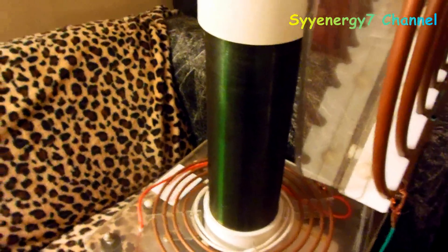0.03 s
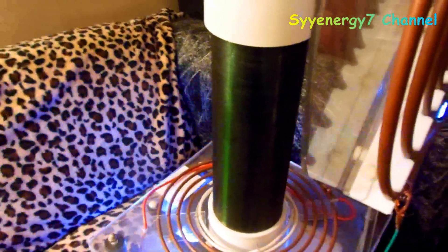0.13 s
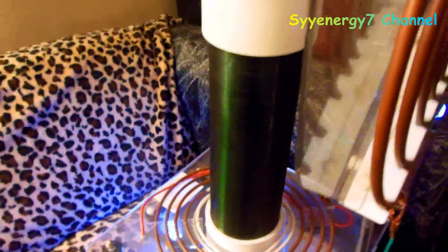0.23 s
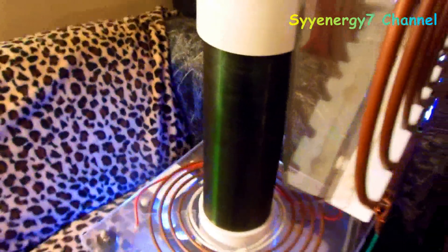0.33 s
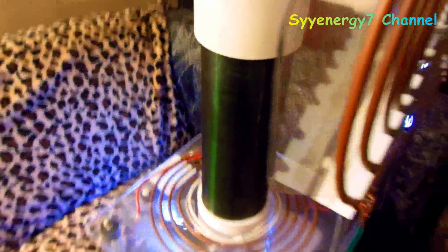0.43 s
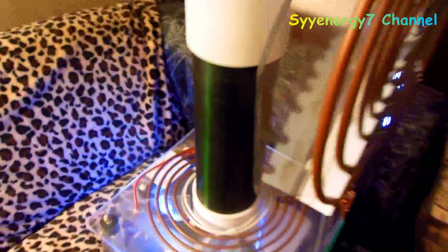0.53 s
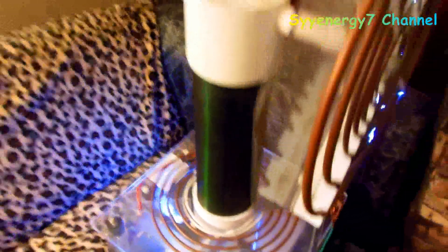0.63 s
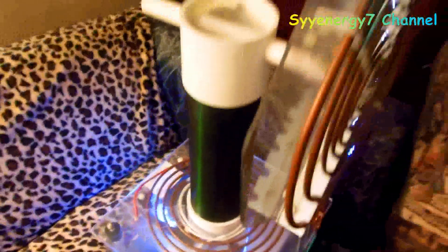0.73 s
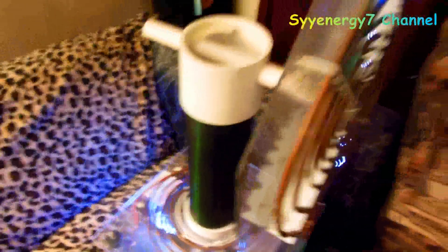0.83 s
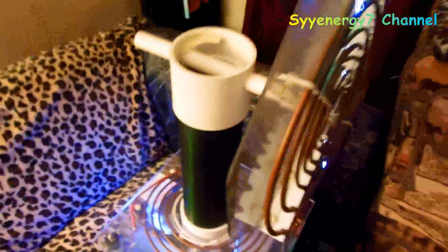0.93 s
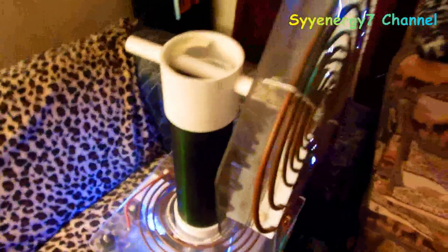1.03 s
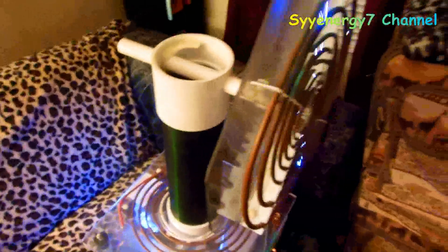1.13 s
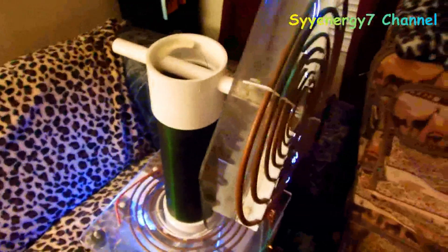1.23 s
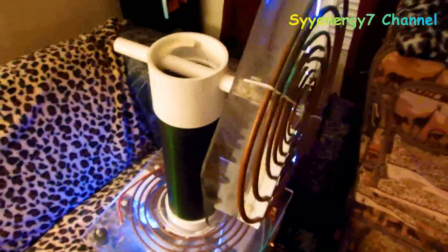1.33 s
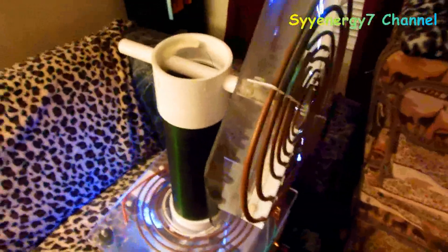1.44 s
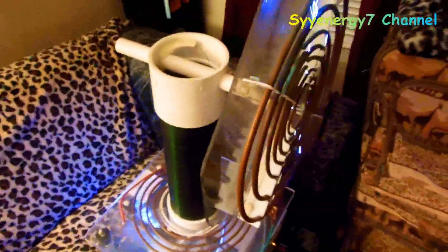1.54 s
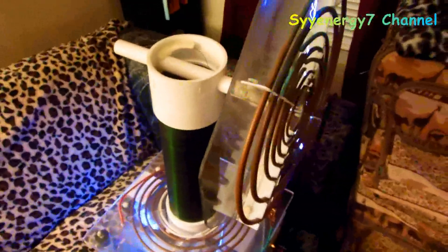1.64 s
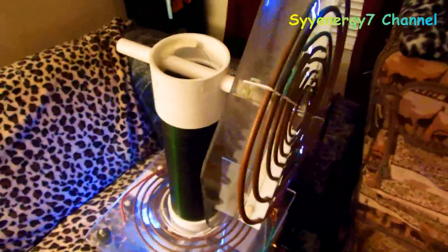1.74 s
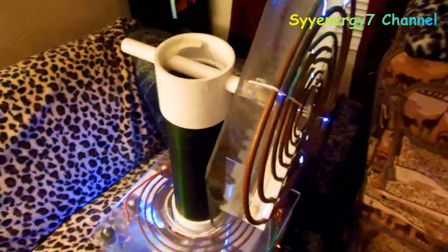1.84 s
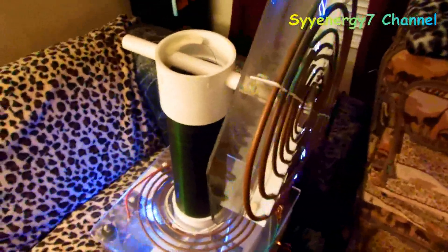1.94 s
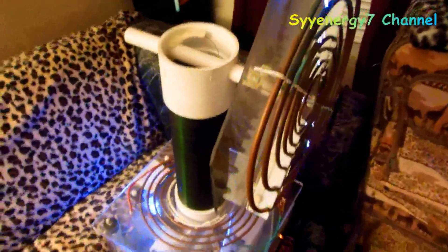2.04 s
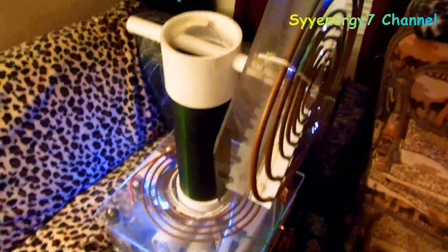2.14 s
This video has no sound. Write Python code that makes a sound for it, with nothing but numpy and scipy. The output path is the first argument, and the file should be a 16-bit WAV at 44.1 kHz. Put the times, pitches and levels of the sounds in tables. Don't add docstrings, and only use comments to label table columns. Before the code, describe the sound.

A harsh electric spark buzz bursts on after a switch snap, overloading, then settles into steady crackle

```python
import sys
import numpy as np
from scipy import signal
from scipy.fft import rfft, irfft
from scipy.io import wavfile
from scipy.ndimage import uniform_filter1d

SR = 44100
rng = np.random.default_rng(int(sys.argv[2]) if len(sys.argv) > 2 else 0)


def to_linear_factor(level_db):
    exponent = np.asarray(level_db, float) / 20
    return 10 ** exponent


def wrap_up_sound(samples):
    columns = np.atleast_2d(samples).T
    tamed = np.clip(columns, -1, 1)
    steps = np.round(tamed * 32767).astype(np.int16)
    wavfile.write(sys.argv[1], SR, steps)


N = 97020
T = np.arange(N) / SR

REFIRE_SHARES = (.55, .15)
# time_s, plate_path_ms, wander_ms
ARC_PATH = [(.2, .5, .03), (.9, .516, .025), (.97, .516, .005), (1.15, .512, .004), (1.2, .516, .02),
            (1.3, .51, .006), (1.42, .508, .004), (1.44, .478, .004), (1.58, .474, .004), (1.6, .512, .008),
            (1.7, .488, .01), (1.8, .5, .018), (1.95, .488, .015), (2.05, .482, .005), (2.2, .5, .006)]
# plate_path_share, left_db, right_db
ECHOES = [
    (.17, -10, -8),
    (.49, -9, -11),
    (.78, -12, -11),
    (1, -2, -1),
    (1.45, -15, -16),
    (1.9, -12, -14),
]
# freq_hz, level_db
CRACK_COLOUR = [(200, -46.5), (1500, -20.5), (3000, -20.5), (4900, -4), (6500, -3.5), (8200, -3.3),
                (11700, -0.4), (14000, -2.5)]
# freq_hz, level_db
ROOM_COLOUR = [(300, -8.5), (900, -13.5), (1600, -5), (2200, -9), (3600, 0.5), (5000, -0.5), (8200, 0.5),
               (11500, 0.7), (14000, 2)]
# time_s, gain_db
SPARK_GAIN = [(.19, 29), (.35, 24), (.5, 19.5), (.65, 11), (.75, 8.5), (.85, 4.5), (.95, -2.2), (1.1, -3.5),
              (1.17, -7), (1.22, -3.5), (1.26, -5), (1.3, -6.5), (1.34, -4), (1.4, -3.5), (1.75, -1.96),
              (2.0, -4.5), (2.2, -4.5)]
# time_s, left_step_fs,
# right_step_fs (full scale)
BIAS_JUMPS = [(0.22, -0.62, 1), (0.2226, 0.22, -1.2), (0.235, 0.08, 0.94), (0.2431, -0.35, -0.61),
              (0.3029, -1.7, -2.8), (0.306, 1, 1), (0.336, -1.1, -0.29), (0.3625, -0.65, -0.49),
              (0.3798, -1.2, -0.47), (0.42, -0.79, -0.32), (0.4345, -1.7, 0.066), (0.4362, 0.01, -0.93),
              (0.4674, -0.78, -1.1), (0.4865, 0.44, 0.14), (0.503, -1.5, -1.3), (0.512, 0.17, 0.58),
              (0.519, -0.39, -1.5), (0.5292, -1.7, -0.84), (0.5366, 1, 0.1), (0.5437, -1.17, -1.24),
              (0.5468, 1, 0.22), (0.5538, -0.41, -0.78), (0.57, -0.56, -2.6), (0.577, 0.38, 0.56),
              (0.5884, 0.76, -0.11), (0.5947, -0.1, -0.58),
              (0.6012, -1.5, -0.7), (0.6098, 0.57, -1.24), (0.62, -2.1, -1.4), (0.6269, 2.2, 0.8),
              (0.6431, -0.77, -0.39), (0.6511, -1.6, -2), (0.6603, -0.21, 0.52), (0.663, 1.6, 0.38),
              (0.6699, -2.5, -0.59), (0.6775, 0.58, 0.17), (0.6833, 1.4, 0.13), (0.7049, -1.16, -0.36),
              (0.7529, -0.92, -0.31), (0.7706, -0.5, 0.0067), (0.7864, 0.08, -0.0011),
              (0.8025, -0.82, -0.18), (0.8183, -0.57, -0.023), (0.8848, -0.15, -0.048),
              (0.9016, -0.16, 0.0003), (1.0135, -0.02, -0.01), (1.2342, -0.03, -0.03),
              (1.7841, -0.06, -0.012), (1.8167, -0.04, -0.02), (1.9178, -0.05, -0.02),
              (1.9689, -0.14, -0.049), (2.051, -0.1, -0.045),
              (0.9684, -0.014, 0.0047), (0.986, -0.032, -0.013), (1.002, -0.049, -0.03),
               (1.068, -0.019, -0.01), (1.2183, -0.017, -0.0075), (1.4688, -0.005, 0.0029),
               (1.951, -0.027, -0.0066)]
# freq_hz, level_db
CLACK_COLOUR = [(300, -18), (1100, 4.5), (1700, 2), (3000, -7), (8000, -2), (14000, -25)]
# freq_hz, rms_db
HUM = [(118.4, -55), (236.9, -70)]
# freq_hz, rms_db
WHINES = [(12328, -80), (13194, -82)]
# freq_hz, density_db (per Hz)
AIR_COLOUR = [(15, -82), (25, -43), (122, -15), (151, -10.5), (363, -20), (511, -54.5), (569, -60),
              (703, -23.5), (14000, -40)]

ON_S, HALF_CYCLE_HZ = 0.2005, 120
PORT_LAG_MS = -0.025
HEADROOM = 0.91


def level(x, db):
    return x * to_linear_factor(db) / np.sqrt(np.mean(x ** 2))


def colour(x, table):
    hz, db = np.array(table).T
    bins_hz = np.arange(1025) * SR / 2048
    log_gain = np.interp(np.log(bins_hz + 1), np.log(hz), db) * np.log(10) / 20
    cepstrum = irfft(log_gain)
    cepstrum[1:1024] *= 2
    cepstrum[1025:] = 0
    response = irfft(np.exp(rfft(cepstrum)))[None, :1024]
    return signal.fftconvolve(np.atleast_2d(x), response, axes=1)[:, :N]


def clicks(times, sizes):
    at = times * SR
    spot = np.floor(at).astype(int)[:, None] + np.arange(-7, 9)
    offset = spot - at[:, None]
    shape = np.sinc(offset) * np.cos(offset * np.pi / 16) ** 2 * sizes[:, None]
    return np.bincount(np.clip(spot, 0, N + 99).ravel(), shape.ravel(), N + 100)[:N]


def band_pass(x, low_hz, high_hz):
    return signal.sosfilt(signal.butter(2, (low_hz, high_hz), "band", fs=SR, output="sos"), x)


def stereo_noise(size, alike_hz):
    mid, side = rng.standard_normal((2, size))
    side = signal.sosfilt(signal.butter(2, min(alike_hz, 15000), "high", fs=SR, output="sos"), side)
    return np.array([mid + side, mid - side])


def firings():
    first_ms, odd_later_ms, jitter_ms = 1.45, 0.75, 0.28
    refire_ms, refire_spread_ms, refire_db, scatter_db = 1.4, 1.5, -2.5, 2.8
    k = np.arange(int(ON_S * HALF_CYCLE_HZ), int(N / SR * HALF_CYCLE_HZ) + 1)
    scatter = rng.standard_normal((len(k), 4)).T
    chance = rng.random((len(k), 4)).T
    first = k / HALF_CYCLE_HZ + (first_ms + odd_later_ms * (k % 2) + jitter_ms * scatter[0]) / 1000
    second = first + (refire_ms + refire_spread_ms * chance[0]) / 1000
    third = second + (refire_ms + refire_spread_ms * chance[1]) / 1000
    again = to_linear_factor(refire_db) * (chance[2] < REFIRE_SHARES[0])
    once_more = again * (chance[3] < REFIRE_SHARES[1])
    strength = to_linear_factor(scatter_db * np.clip(scatter[1:], -3, 1.3))
    sizes = [np.ones(len(k)), again, once_more] * strength
    return np.r_[first, second, third], sizes.ravel()


def cracks(times, sizes):
    arc_s, path_ms, wander_ms = np.array(ARC_PATH).T
    path = np.interp(times, arc_s, path_ms)
    loose = np.interp(times, arc_s, wander_ms)
    wander = rng.standard_normal((len(times), len(ECHOES), 2)).T
    out = np.array([clicks(times, sizes), clicks(times + PORT_LAG_MS / 1000, sizes)])
    for j, (share, *echo_db) in enumerate(ECHOES):
        for c, sign in enumerate((1, -1)):
            stray = loose * (wander[0, j] + 0.59 * sign * wander[1, j])
            late_ms = share * path + c * PORT_LAG_MS + stray
            out[c] += to_linear_factor(echo_db[c]) * clicks(times + late_ms / 1000, sizes)
    return level(colour(out, CRACK_COLOUR), -16)


def room(times, sizes):
    t60_s, gap_ms = 0.26, 2
    t = T[:SR // 2]
    polarity = np.floor(times * HALF_CYCLE_HZ) % 2
    fade = to_linear_factor(-60 * t / t60_s) * np.clip(t * 1000 / gap_ms - 1, 0, 1)
    out = 0
    for k in range(2):
        tail = stereo_noise(len(t), 4860) * fade
        sparks = clicks(times, sizes * (polarity == k))
        out = out + signal.fftconvolve(sparks[None], tail, axes=1)[:, :N]
    return level(colour(out, ROOM_COLOUR), -22.5)


def bias(times, sizes, drive):
    bias_hz, damping = 8.25, 0.62
    jump_ms, right_slower = 0.24, 1.96
    nudge_db, nudge_scatter_db = -49, 3
    jump_s, left, right = np.array(BIAS_JUMPS).T
    even = np.floor(times * HALF_CYCLE_HZ) % 2 == 0
    push = sizes * even * to_linear_factor(nudge_scatter_db * rng.standard_normal(len(times)))
    nudges = -to_linear_factor(nudge_db) * clicks(times, push) * drive
    w = 2 * np.pi * bias_hz
    b, a = signal.bilinear([1, 0], [1, 2 * damping * w, w * w], SR)
    out = []
    for steps, rise_ms in ((left, jump_ms), (right, jump_ms * right_slower)):
        swing = SR * signal.lfilter(b, a, clicks(jump_s, steps) + nudges)
        pole = np.exp(-1000 / (rise_ms * SR))
        out.append(signal.lfilter([1 - pole], [1, -pole], swing))
    return np.array(out)


def preamplifier(sparks, drift):
    bias_rail, squash = 1, 0.9
    dip_db, dip_ms = -32, 0.17
    squeezed = np.tanh(sparks / HEADROOM)
    drift = drift / bias_rail
    held = bias_rail * drift / (1 + drift ** 4) ** 0.25
    offset = held * (1 - squash * squeezed ** 2)
    power = uniform_filter1d(np.abs(squeezed), int(dip_ms * SR / 1000) + 1, axis=1)
    dip = to_linear_factor(dip_db) * (power - uniform_filter1d(power, SR // 60, axis=1))
    return HEADROOM * squeezed + offset - dip


def clack():
    start_s, decay_ms = 0.1948, 7
    fade = (T > start_s) * np.exp(-np.abs(T - start_s) * 1000 / decay_ms)
    return to_linear_factor(-10) * fade * level(colour(stereo_noise(N, 2500), CLACK_COLOUR), 0)


def tick():
    start_s, decay_ms = 0.107, 9
    fade = (T > start_s) * np.exp(-np.abs(T - start_s) * 1000 / decay_ms)
    return to_linear_factor(-47) * fade * level(band_pass(rng.standard_normal(N), 420, 720), 0)


def quiet_room():
    duck_db, duck_s = -10, 0.4
    tones = sum(to_linear_factor(db) * np.sqrt(2) * np.sin(2 * np.pi * hz * T) for hz, db in HUM + WHINES)
    air = level(colour(stereo_noise(N, 620), AIR_COLOUR), -54)
    duck = to_linear_factor(duck_db * np.clip((T - ON_S) / duck_s, 0, 1))
    return duck * (tones + air)


def rumble():
    return level(band_pass(stereo_noise(N, 140), 18, 70), -57.5)


def scene():
    times, sizes = firings()
    drive = to_linear_factor(np.interp(T, *np.array(SPARK_GAIN).T))
    sparks = drive * (cracks(times, sizes) + room(times, sizes))
    overloaded = preamplifier(sparks, bias(times, sizes, drive))
    return overloaded + clack() + tick() + quiet_room() + rumble()


def top_cut(x):
    return signal.sosfilt(signal.butter(12, 15540, fs=SR, output="sos"), x)


def record(dry):
    cut = signal.sosfilt(signal.ellip(9, 0.5, 70, 14200, fs=SR, output="sos"), dry)
    return top_cut(np.clip(cut, -1, 1))


dry = scene()
out = record(dry)
wrap_up_sound(out)
```